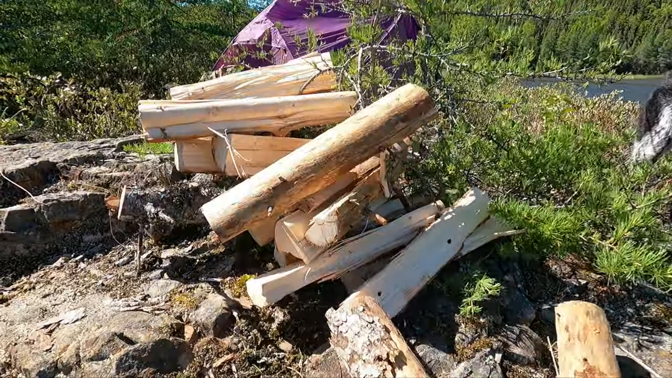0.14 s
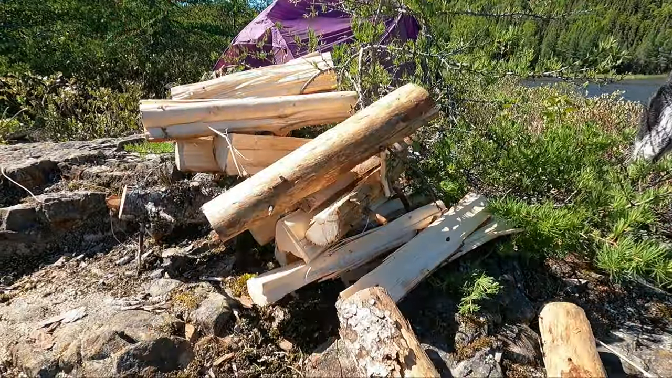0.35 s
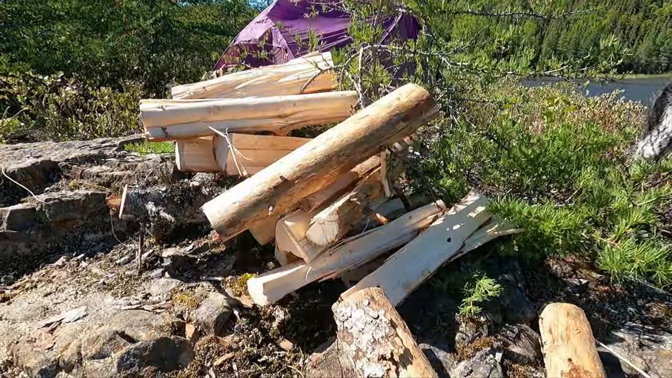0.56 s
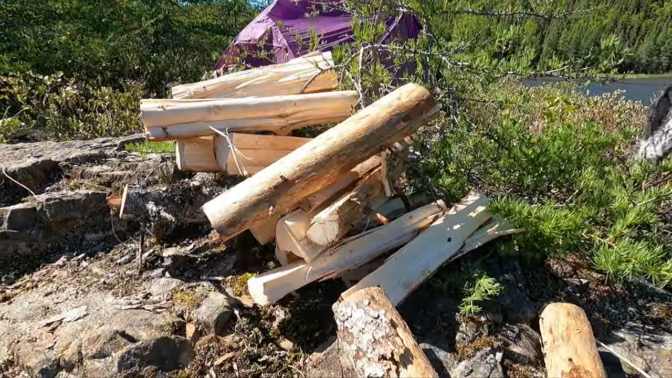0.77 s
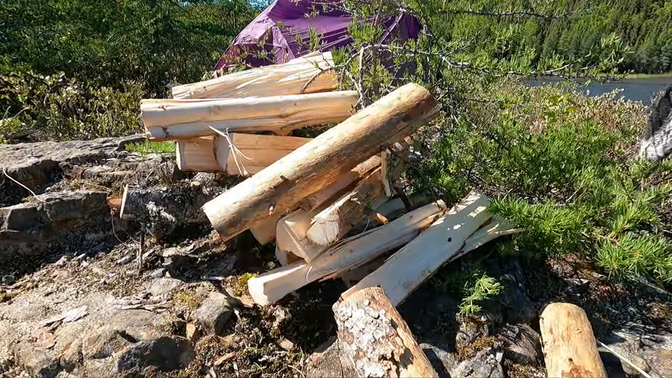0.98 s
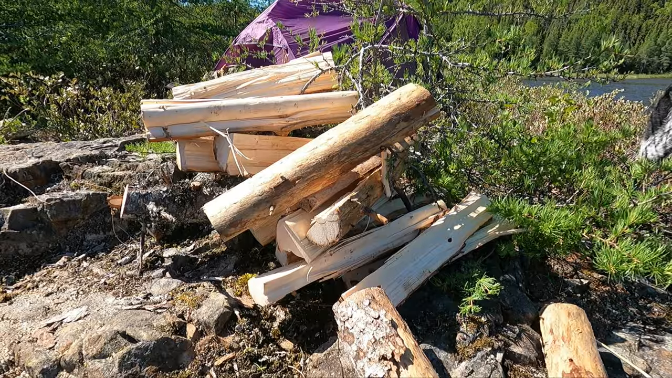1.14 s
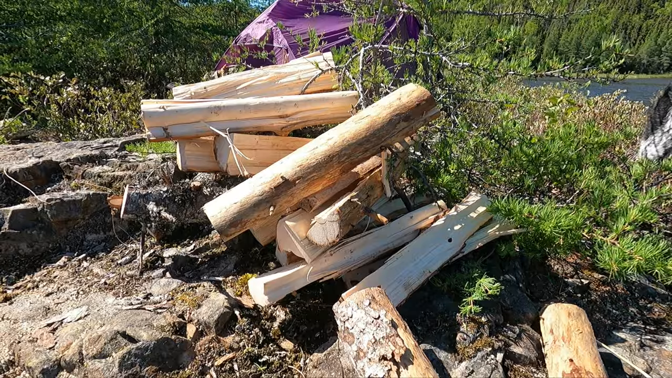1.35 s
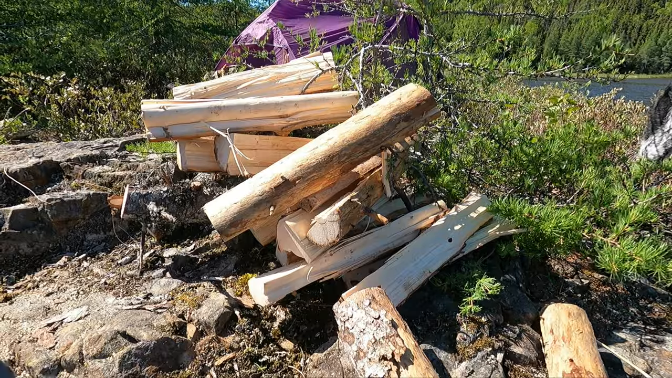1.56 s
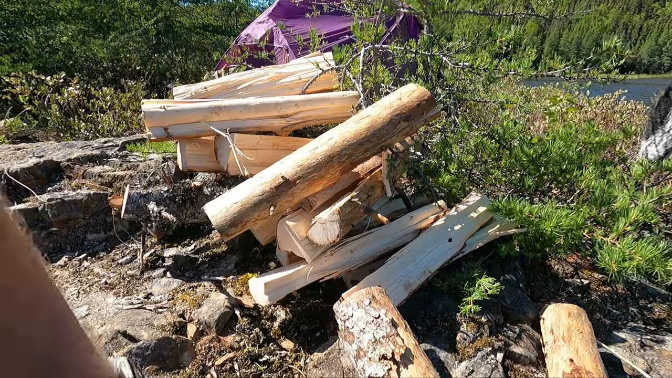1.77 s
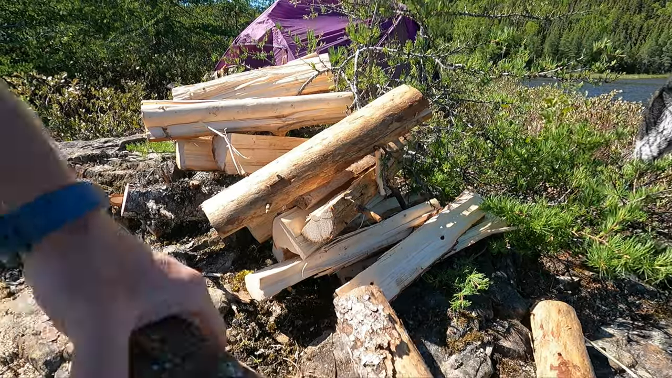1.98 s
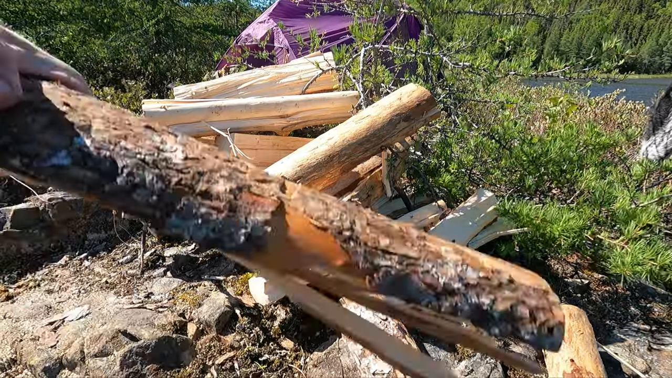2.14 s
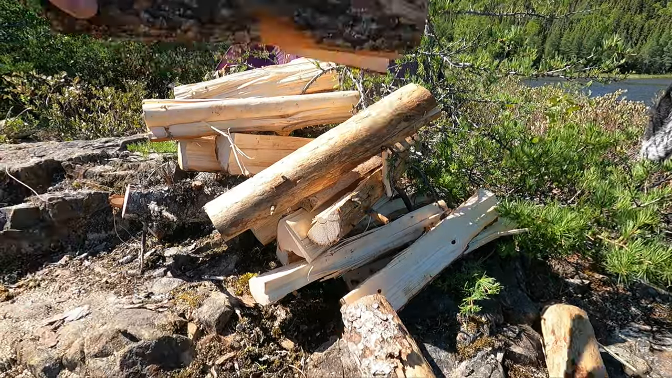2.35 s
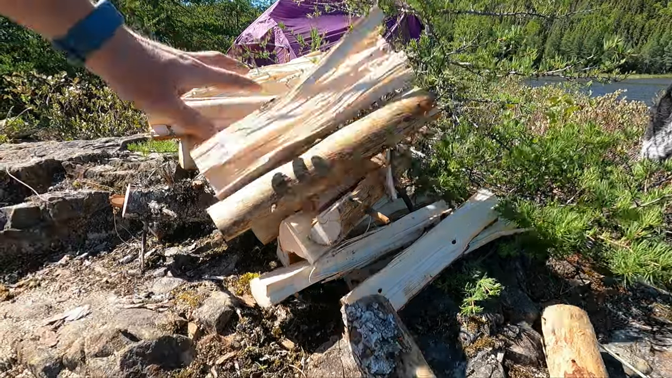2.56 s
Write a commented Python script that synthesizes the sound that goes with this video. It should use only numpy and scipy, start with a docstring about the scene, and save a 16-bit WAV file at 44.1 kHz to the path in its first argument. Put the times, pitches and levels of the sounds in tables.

```python
"""Rocky lakeshore: split logs scrape, knock and thud together as an armful is moved close by.
Scrapes are filtered friction grains; thuds are low rings. Wood knocks and, around 1.02 to 1.15 s,
small water plops are short modal rings with a noisy onset.
Water laps as patchy filtered hiss with bubbles, each a gliding sine.
Wind rumbles on the microphone as lumpy low-frequency noise."""
import sys
import numpy as np
from scipy import signal
from scipy.fft import rfft, irfft
from scipy.io import wavfile
from scipy.ndimage import uniform_filter1d

SR = 44100
rng = np.random.default_rng(int(sys.argv[2]) if len(sys.argv) > 2 else 0)


def linear_from_db(decibels):
    """Turn decibels (scalar or array-like) into linear amplitude factors; 0 gives 1."""
    return 10 ** (np.asarray(decibels, float) / 20)


def persist_wave(psi):
    """Save psi, clipped to +-1, as 16-bit WAV."""
    counts = np.round(np.clip(psi, -1, 1) * 32767).astype(np.int16)
    wavfile.write(sys.argv[1], SR, np.atleast_2d(counts).T)


N = 116865


def evened(x):
    """Scales to rms 1."""
    return x / np.sqrt(np.mean(x ** 2) + 1e-20)


def curve(points):
    """Gain of every sample from (time_s, level_db) points, linear in dB."""
    time_s, level_db = np.transpose(points)
    return linear_from_db(np.interp(np.arange(N) / SR, time_s, level_db))


def add(mix, start_s, sound):
    """Mixes a sound in place, cut at the end of the mix."""
    part = mix[round(start_s * SR):][:len(sound)]
    part += sound[:len(part)]


def colour(x, spectrum):
    """Filters by (freq_hz, level_db) points over log frequency, then scales to rms 1."""
    freq_hz, level_db = np.transpose(spectrum)
    hz = np.fft.rfftfreq(len(x), 1 / SR)
    gain_db = np.interp(np.log(hz + 1), np.log(freq_hz + 1), level_db, -120, -120)
    return evened(irfft(rfft(x) * linear_from_db(gain_db), len(x)))


def lumps(width_s):
    """Slow random wander of rms 1: noise smoothed twice."""
    size = round(width_s * SR)
    smooth = uniform_filter1d(rng.standard_normal(N), size)
    return evened(uniform_filter1d(smooth, size))


def patchy(x, tilt_db_per_octave):
    """Uneven colour of one event: spectral tilt plus random humps, rms 1."""
    humps_per_octave, hump_db = 5.0, 4
    octave = np.log2(np.fft.rfftfreq(len(x), 1 / SR) / 1000 + 0.033)  # re 1 kHz
    humps = np.interp((octave + 4) * humps_per_octave, np.arange(80), rng.standard_normal(80))
    gain_db = hump_db * humps + tilt_db_per_octave * octave
    return evened(irfft(rfft(x) * linear_from_db(gain_db), len(x)))


def mottled(depth_db):
    """Noise with random level patches over time and frequency."""
    z = signal.stft(rng.standard_normal(N + 512), nperseg=512, noverlap=384)[2]
    field = uniform_filter1d(rng.standard_normal(z.shape), size=7, axis=0)  # across frequency
    field = evened(uniform_filter1d(field, size=9, axis=1))  # across time
    return signal.istft(z * linear_from_db(depth_db * field), nperseg=512, noverlap=384)[1][:N]


# resonances of the loose kindling: freq_hz
KINDLING_HZ = [835, 1138.3, 1360, 2108.5, 2440, 2700, 3390, 5499]


def kindling(x):
    """Lifts the bands in which loose kindling rattles along, until it lies still."""
    half_width_hz, lift_db, still_s = 45, 8, 0.65
    hz = np.fft.rfftfreq(N, 1 / SR)
    peaks = sum(1 / (1 + ((hz - f) / half_width_hz) ** 2) for f in KINDLING_HZ)
    rattling = evened(irfft(rfft(x) * linear_from_db(lift_db * peaks), N))
    return np.where(np.arange(N) < still_s * SR, rattling, x)


# wood and bark sliding: start_s, length_s, level_db, tilt_db_per_octave
SLIDES = [(0, 0.0432, -39, 1.46), (0.062, 0.096, -39, 4.5), (0.125, 0.0586, -43, 6),
          (0.174, 0.0839, -34, -3.98), (0.287, 0.0262, -33.5, 1.5), (0.304, 0.0725, -42, 7),
          (0.352, 0.072, -23.5, -0.5), (0.392, 0.109, -32.5, -0.73), (0.504, 0.1316, -29.5, -2),
          (0.625, 0.1556, -65, 1.5), (0.868, 0.16, -67, 2.5), (1.288, 0.0728, -55, 2),
          (1.72, 0.0612, -48, 5), (1.792, 0.1405, -56.5, 10.5), (1.92, 0.206, -37.5, -3.5),
          (2.007, 0.059, -52.5, 18), (1.964, 0.026, -56.5, 13), (2.038, 0.1612, -44.5, -0.5),
          (2.209, 0.1604, -48, 0), (2.324, 0.099, -46, -2), (2.5, 0.18, -50, 6.5)]
# relative friction spectrum: freq_hz, level_db_per_hz
FRICTION_SPECTRUM = [(260, -13), (450, -2), (756, -9.5), (1680, -15), (4090, -15), (11000, -45.5),
                     (15500, -55.5)]


def scrapes():
    """Slides of wood and bark: clumped friction grains over mottled noise, swelling and fading."""
    grains_per_s, grain_db, edge_share = 4000, 4.5, 0.45
    out = np.zeros(N)
    hits = rng.random(N) < grains_per_s / SR
    strength = linear_from_db(grain_db * np.minimum(rng.exponential(1, N), 2.5))
    grains = hits * rng.standard_normal(N) * strength
    friction = evened(grains) + 0.9 * evened(mottled(2.5))
    rub = kindling(colour(friction * linear_from_db(2.8 * lumps(0.0017)), FRICTION_SPECTRUM))
    for start_s, length_s, level_db, tilt_db_per_octave in SLIDES:
        part = rub[round(start_s * SR):][:round(length_s * SR)]
        u = np.linspace(0, 1, len(part))
        swell = np.clip(np.minimum(u, 1 - u) / edge_share, 0, 1) ** 2
        add(out, start_s, linear_from_db(level_db) * swell * patchy(part, tilt_db_per_octave))
    return out


def bubble(length_s, level_db, first_hz, last_hz):
    """A fading, fluttering sine whose wobbling pitch glides, mostly up, as the bubble nears the surface."""
    bend, wobble_share = 1.2, 0.055
    fade_db, flutter_db = -9, 5.0
    u = np.linspace(0, 1, round(length_s * SR))
    wobble, flutter = (np.interp(u * length_s / 0.0054, np.arange(40), v)
                       for v in rng.standard_normal((2, 40)))
    hz = first_hz * (last_hz / first_hz) ** u ** bend * (1 + wobble_share * wobble)
    attack = np.minimum(u * length_s / 0.0023, 1)
    release = np.minimum((1 - u) / 0.095, 1)
    level = linear_from_db(level_db + fade_db * u + flutter_db * flutter)
    return attack * release * level * np.sin(2 * np.pi * np.cumsum(hz) / SR)


# clear bubbles: start_s, length_s, level_db, first_hz, last_hz
BUBBLES = [(0.865, 0.076, -60.5, 677, 600), (0.948, 0.1, -64, 557.4, 553), (1.028, 0.024, -48, 1097, 1360),
           (1.021, 0.039, -47.5, 831, 779), (1.148, 0.0468, -48, 1093, 2005),
           (1.464, 0.029, -49.5, 1300, 1502), (1.584, 0.0457, -47.5, 973.7, 1121),
           (1.734, 0.0617, -40, 347.7, 448.2), (1.8, 0.061, -45.5, 599.7, 1647),
           (1.788, 0.11, -42.5, 469.9, 998), (1.774, 0.079, -50.5, 1130, 1137),
           (1.878, 0.02257, -31, 633, 1315), (2.276, 0.016, -42, 947, 1255),
           (2.279, 0.0963, -40.5, 377.4, 863), (2.324, 0.036, -37, 741.2, 1317),
           (2.348, 0.022, -41.5, 1302, 1830)]
# lapping level: time_s, level_db
LAP_LEVEL = [(0.0, -53.5), (0.14, -51), (0.26, -48), (0.41, -53), (0.45, -48.5), (0.61, -55.5), (0.69, -75),
             (0.94, -68.5), (1.24, -63), (1.55, -50), (1.7, -56), (1.97, -48), (2.38, -64.5), (2.65, -54)]
# relative hiss spectrum: freq_hz, level_db_per_hz
WASH_SPECTRUM = [(210, -36.5), (350, 0.5), (928, -2.5), (1160, -4), (2880, -10), (3940, -12), (7510, -17.5),
                 (15000, -55.5)]


def water():
    """Patchy hiss of small waves with random little bubbles in it, clear bubbles on top."""
    small_per_s, small_db = 250, -11  # small_db re hiss
    small, clear = np.zeros(N), np.zeros(N)
    for when, pitch, length, drop in rng.random((round(small_per_s * N / SR), 4)):
        hz = 700 * 4.4 ** pitch
        add(small, when * N / SR, bubble(9 / hz * (0.42 + length), -16 * drop, hz, 1.3 * hz))
    for start_s, *row in BUBBLES:
        add(clear, start_s, bubble(*row))
    hiss = colour(mottled(1.6) * linear_from_db(1.4 * lumps(0.033)), WASH_SPECTRUM)
    return clear + curve(LAP_LEVEL) * (hiss + linear_from_db(small_db) * evened(small))


# gust level: time_s, level_db
GUST_LEVEL = [(0, -34.5), (.2, -33), (.33, -28), (.42, -21), (.5, -23.5), (.6, -25.5), (.72, -28),
              (.8, -36), (1.18, -34.5), (1.26, -38), (1.68, -40.5), (1.85, -27.5), (2.03, -21.5),
              (2.2, -33), (2.4, -26.5), (2.5, -35.5), (2.65, -27)]
# relative turbulence spectrum: freq_hz, level_db_per_hz
RUMBLE_SPECTRUM = [(8.8, -41.5), (15, -1.5), (54, -0.5), (141, -10), (290, -26.5), (441, -38.5), (600, -74),
                   (1320, -120)]


def wind():
    """Turbulence on the microphone: lumpy low noise following the gusts."""
    turbulence = rng.standard_normal(N) * linear_from_db(3.2 * lumps(0.017))
    return curve(GUST_LEVEL) * colour(turbulence, RUMBLE_SPECTRUM)


def ring(hz, t60_s, rise_s, sag):
    """One decaying mode; pitch starts a share sag high and settles to hz."""
    t = np.arange(0, 1.5 * t60_s, 1 / SR)
    turns = np.cumsum(hz * (1 + sag * np.exp(-t / 0.002192))) / SR
    rise = 1 - np.exp(-(t / rise_s) ** 2)
    return rise * linear_from_db(-60 * t / t60_s) * np.sin(2 * np.pi * turns)


# wood knocks and, around 1.02 to 1.15 s, small water plops:
# start_s, level_db, base_pitch_hz, base_t60_s, onset_db (re level_db)
SHORT_RINGS = [(0.025, -5, 571.2, 0.01356, -44), (0.067, -34, 900, 0.0429, -1.5),
               (0.133, -44, 845, 0.021, 11.5), (0.143, -19, 4710, 0.0133, -7),
               (.198, -13.5, 1148, 0.02866, -22.5), (0.214, -20, 464, 0.0184, -17),
               (.232, -14, 379.7, 0.02875, -18.5), (0.2358, -25, 2135, 0.0337, -4),
               (0.2384, -17, 787, 0.03085, -12.5), (0.303, -21, 4137, 0.0507, -5.5),
               (.362, -32.5, 656, 0.0465, 1.5), (.385, -16.5, 3661, 0.04, -4),
               (.391, -12.5, 897.6, 0.035, -7.5), (0.39, -10, 2486, 0.0404, -3.5),
               (0.395, -22.5, 3870, 0.0356, -2.5), (0.411, -31, 1197, 0.095, -25.5),
               (0.4295, -4.5, 368.3, 0.03, -8), (0.432, -24.5, 931, 0.082, -5),
               (0.522, -15.5, 970.6, 0.025, -13), (0.529, -15, 815, 0.0379, -5),
               (0.532, -28, 2854, 0.0675, -10.5), (.56, -20.5, 2361, 0.043, -10.5),
               (.572, -28, 775, 0.0145, -28.5), (0.659, -49, 2525, 0.0727, -6.5),
               (.887, -54, 1300, 0.036, -4), (1.025, -28.5, 1370, 0.01427, -13),
               (1.068, -41, 3130, 0.015, -8), (1.084, -36.5, 1485, 0.0283, -4),
               (1.092, -51.5, 2270, 0.0205, 11.5), (1.138, -45.5, 2006, 0.019, 3.5),
               (1.233, -14.5, 471.2, 0.01817, -21), (1.247, -23.5, 281, 0.0254, -25.5),
               (1.291, -36.5, 955, 0.026, -37.5), (1.539, -36, 1550, 0.0188, -11),
               (1.75, -34, 1578, 0.0333, -12.5), (1.967, -36, 2510, 0.038, 0.5),
               (2.027, -30, 1053, 0.0358, -36.5), (2.101, -33, 1549, 0.05, -18.5),
               (2.146, -36.5, 949, 0.053, -16.5), (1.151, -45, 1344, 0.0258, -23),
               (2.48, -39, 3877, 0.037, -8), (2.584, -33.5, 2466, 0.02125, -3),
               (2.607, -39, 3580, 0.0168, 4)]
# modes of every short ring: pitch_ratio, level_db, t60_share
RING_MODES = [(0.91, 4, 0.822), (.52, -5, 1), (1.22, -5.5, .9), (1.7, -19.5, 1), (2.1, -13, 0.8),
              (3, -29, 0.88)]
# relative onset-noise spectrum: freq_hz, level_db_per_hz
ONSET_SPECTRUM = [(350, -28), (600, -3), (866, -5), (1780, -3.5), (2470, -13), (3900, -12.5), (5660, -20),
                  (10600, -44.5), (15500, -56.5)]


def short_rings():
    """Wood knocks and small water plops: one mode pattern, detuned each time, with a noisy onset."""
    detune_share, damp_hz = 0.0581, 2900  # modes near and above damp_hz die faster
    rise_share, onset_t60_share = 0.058, 1.283  # of base_t60_s
    out = np.zeros(N)
    lumpy = rng.standard_normal(N) * linear_from_db(1.1 * lumps(0.003))
    onset_noise = kindling(colour(lumpy, ONSET_SPECTRUM))
    detune = 1 + detune_share * rng.standard_normal((len(SHORT_RINGS), len(RING_MODES)))
    t = np.arange(2048) / SR
    for (start_s, level_db, pitch_hz, t60_s, onset_db), offsets in zip(SHORT_RINGS, detune):
        for (ratio, mode_db, t60_share), offset in zip(RING_MODES, offsets):
            hz = min(pitch_hz * ratio * offset, 14000)
            mode_t60_s = t60_s * t60_share / (1 + (hz / damp_hz) ** 2)
            add(out, start_s, linear_from_db(level_db + mode_db) * ring(hz, mode_t60_s, 0.001602, 0.2502))
        rise_s = rise_share * t60_s
        rise = 1 - np.exp(-(t / rise_s) ** 2)
        decay = linear_from_db(level_db + onset_db - 60 * t / (onset_t60_share * t60_s))
        noise = np.roll(onset_noise, -round(start_s * SR))[:len(t)]
        tilt_db_per_octave = np.log2(pitch_hz / 500) * 2.0  # higher rings start brighter
        add(out, start_s - rise_s, rise * decay * patchy(noise, tilt_db_per_octave))
    return out


# heavy logs landing: start_s, level_db, settled_pitch_hz, t60_s
THUDS = [(.139, -15, 267.6, 0.0184), (0.192, -18.5, 300, 0.0253), (2.091, -28.5, 399, 0.0395),
         (0.389, -3.5, 153, 0.0516), (0.404, -4.5, 54.2, 0.1124), (0.427, -4, 188, 0.074),
         (0.527, -8, 180.1, 0.169), (0.552, -14, 93, 0.135), (.575, -8, 191.5, 0.1426),
         (0.61, -8, 74.7, 0.052), (1.967, -19.5, 355.7, 0.104), (1.974, -5.5, 65.6, 0.072),
         (1.988, -9.5, 176.8, 0.09), (2.017, -21, 333.4, 0.063), (2.035, -15, 172.9, 0.184),
         (2.043, -15, 306.6, 0.032), (2.095, -20.5, 182.1, 0.146), (2.114, -21, 372.3, 0.034),
         (2.17, -16.5, 116, 0.075), (2.3, -17, 73.7, 0.124), (0.259, -19, 82, 0.031),
         (.31, -18.5, 95.7, 0.0705), (0.945, -15, 78.7, 0.0257), (1.76, -29.5, 145.5, 0.226),
         (2.347, -23.5, 165.2, 0.0826), (.67, -21.5, 140.2, 0.208), (1.905, -25, 220, 0.128)]


def thuds():
    """Heavy logs landing: low short rings that swell over a few milliseconds."""
    out = np.zeros(N)
    for start_s, level_db, pitch_hz, t60_s in THUDS:
        add(out, start_s, linear_from_db(level_db) * ring(pitch_hz, t60_s, 0.0021, 0.3))
    return out


def scene():
    """Sums all layers into one channel."""
    return (scrapes() + water() + wind() + short_rings() + thuds())[None]


def low_pass(x):
    """Removes everything above the highest recorded frequency."""
    return signal.sosfilt(signal.butter(12, 15720, fs=SR, output="sos"), x)


def record(dry):
    """Turns the dry mix into the output."""
    return low_pass(dry)


dry = scene()
out = record(dry)
persist_wave(out)
```